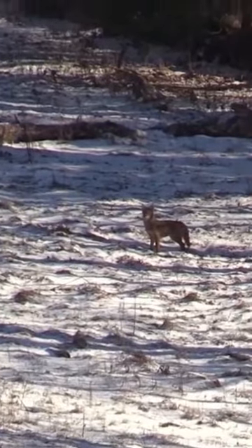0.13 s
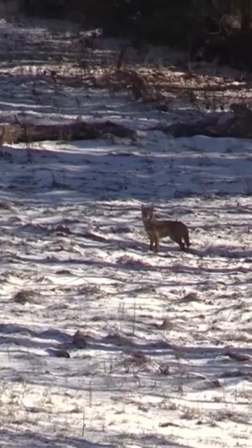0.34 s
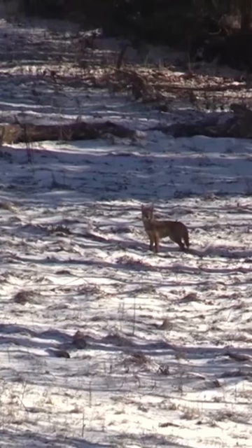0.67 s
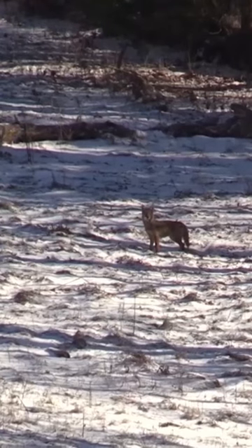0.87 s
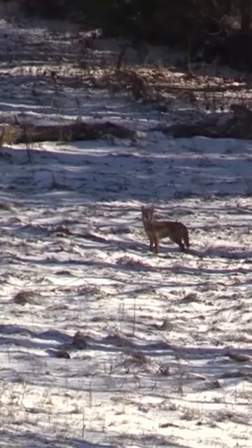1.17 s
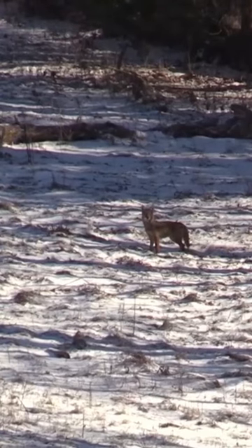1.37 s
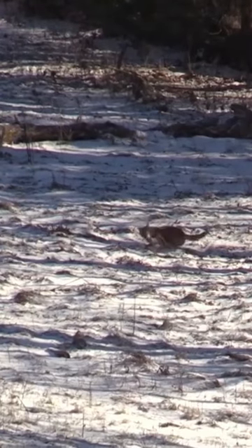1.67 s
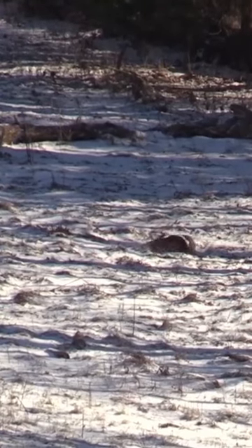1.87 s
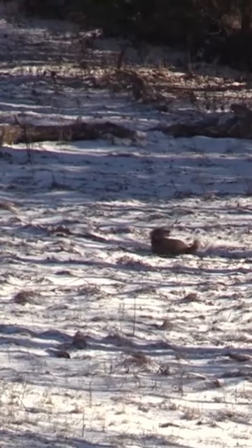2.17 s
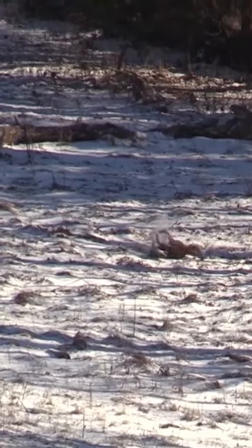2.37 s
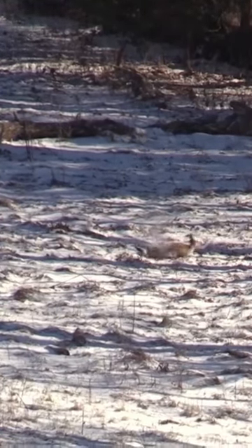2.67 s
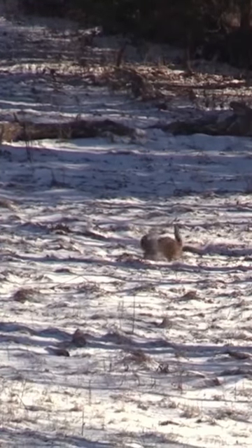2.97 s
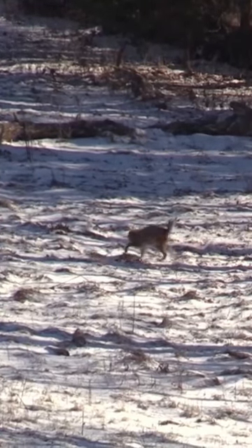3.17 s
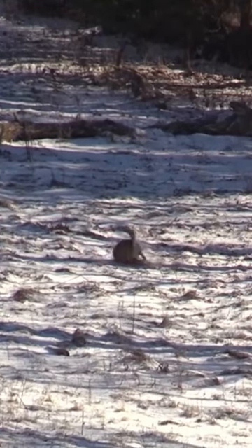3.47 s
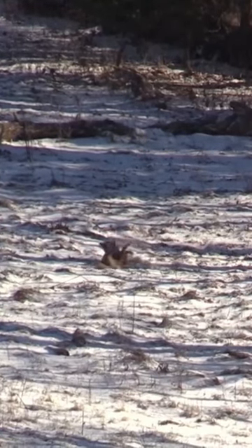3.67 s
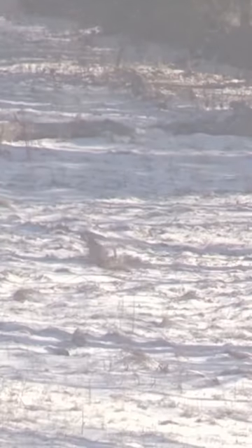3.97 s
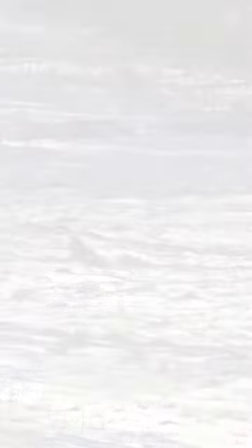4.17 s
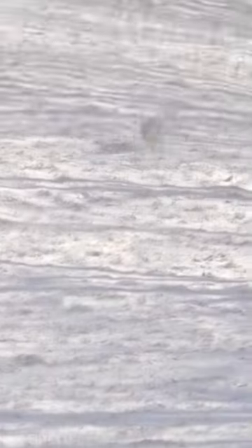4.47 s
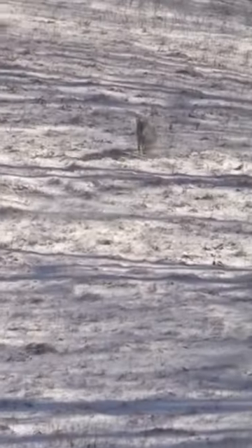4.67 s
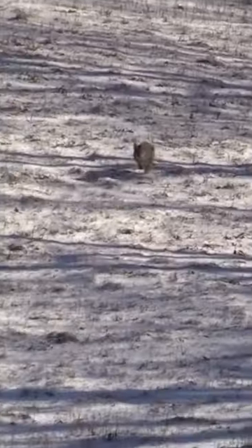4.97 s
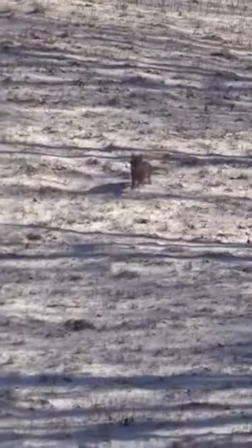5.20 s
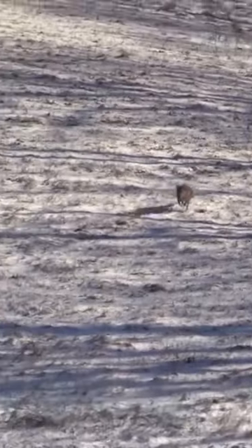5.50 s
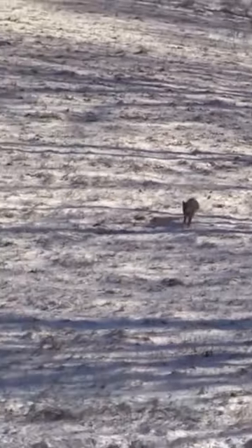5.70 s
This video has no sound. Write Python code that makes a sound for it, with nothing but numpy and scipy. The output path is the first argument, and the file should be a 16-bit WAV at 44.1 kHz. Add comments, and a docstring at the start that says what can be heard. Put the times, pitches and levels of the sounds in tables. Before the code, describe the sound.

Short high reed squeals, one loud gunshot rolling off trees and hills, a hoarse coyote and bolt clicks, then a click and gusty wind.

```python
"""A reed lure squeals in short phrases over a snowy field: partials on a gliding pitch, with a pop at some openings.
A rifle fires, a burst of coloured noise and a low push; its echo rolls back from trunks, treeline and hills.
A coyote barks and whines in partials and growls in pulsed noise; the rifle's bolt clicks as short rings.
Wind is lumpy filtered noise at the microphone, with far rustle and a faint tone behind it.
Late on, a click marks the scene changing to a windier field, where the lure is coloured differently."""
import sys
import numpy as np
from scipy import signal
from scipy.fft import rfft, irfft, next_fast_len
from scipy.io import wavfile
from scipy.ndimage import uniform_filter1d, minimum_filter1d, map_coordinates

SR = 44100
rng = np.random.default_rng(int(sys.argv[2]) if len(sys.argv) > 2 else 0)


def to_wav(s):
    """Save 16-bit WAV."""
    ch = np.atleast_2d(s).T  # columns
    pcm = np.round(np.clip(ch, -1, 1) * 32767)  # PCM
    wavfile.write(sys.argv[1], SR, pcm.astype(np.int16))


def rack_gain(trim_db):
    """Turn a fader trim in dB into the linear factor to multiply a signal by."""
    fader = np.asarray(trim_db, float)
    return 10 ** (fader / 20)


N = 257544  # samples

# click where the second field begins: t/s, level/dB
CUT = (4.262, -16)


def unit(x):
    """Scaled to rms 1."""
    return x / np.sqrt(np.mean(x ** 2) + 1e-20)


def along(points, hz):
    """(Hz, value) points read on a log frequency axis."""
    f, v = np.transpose(points)
    return np.interp(np.log(hz + 1), np.log(f + 1), v)


def curves(rows):
    """One value per sample for each column after the time."""
    s, *cols = np.transpose(rows)
    return [np.interp(np.arange(N) / SR, s, c) for c in cols]


def gate(rows, fade):
    """Open from the first row to the last, with soft edges (s)."""
    t = np.arange(N) / SR
    return np.clip(np.minimum(t - rows[0][0], rows[-1][0] - t) / fade + 0.5, 0, 1)


def wobble(rate):
    """A smooth random curve, rate knots a second."""
    knots = rng.standard_normal(int(N * rate / SR) + 4)
    return map_coordinates(knots, [np.arange(N) * rate / SR])


def filtered(x, response):
    """x times a response of frequency."""
    m = next_fast_len(len(x) + 8192)
    return irfft(rfft(x, m) * response(np.fft.rfftfreq(m, 1 / SR)), m)[:len(x)]


def rush(spectrum, patchy_db):
    """Coloured noise of rms 1 with patches of random gain in time and frequency."""
    z = signal.stft(rng.standard_normal(N), nperseg=512)[2]
    field = uniform_filter1d(uniform_filter1d(rng.standard_normal(z.shape), 8, 0), 5, 1)
    x = signal.istft(z * rack_gain(patchy_db * unit(field)), nperseg=512)[1][:N]
    return unit(filtered(x, lambda hz: rack_gain(along(spectrum, hz))))


def turns(hz, jitter):
    """Phase of an oscillator whose pitch trembles."""
    return 2 * np.pi * np.cumsum(hz * (1 + jitter * wobble(150))) / SR


def lure():
    """A blown reed pops open, then sings partials coloured by the bell; the lip moves the pitch smoothly."""
    # reed phrases, each a list of: t/s, pitch f/Hz, level/dB
    squeals = [
        [(0.0, 1102, -48.5), (0.02, 1291, -35), (0.035, 1379, -39.5), (0.05, 1434, -43.5), (0.074, 1554, -37.5),
         (0.081, 1940, -40.5), (0.088, 1967, -33.5), (0.126, 1969, -34.5), (0.152, 1686, -42.5),
         (0.175, 1715, -44.5)],
        [(0.365, 1064, -53.5), (0.389, 1321, -43.5), (0.417, 1325, -43), (0.453, 1333, -40), (0.462, 1470, -43),
         (0.468, 1599, -33.5), (0.479, 1592, -35), (0.53, 1593, -77.5)],
        [(0.652, 1806, -52), (0.668, 1569, -35), (0.69, 1714, -31.5), (0.7, 1785, -44), (0.707, 2270, -45),
         (0.716, 2690, -42), (0.74, 2758, -47.5), (0.765, 2648, -36), (0.839, 2805, -35), (0.909, 2818, -39.5),
         (0.929, 2254, -48), (0.94, 2157, -54)],
        [(1.072, 1038, -48), (1.088, 1186, -40.5), (1.118, 1438, -46.5), (1.14, 1939, -39), (1.15, 2335, -39),
         (1.182, 2459, -40), (1.21, 2400, -40), (1.224, 2442, -38), (1.285, 2569, -40), (1.31, 2464, -39.5)],
        [(1.545, 2328, -35), (1.575, 2639, -37), (1.59, 2619, -42)],
        [(1.63, 2163, -40), (1.65, 2350, -35), (1.67, 2441, -35), (1.735, 2524, -38)],
        [(1.76, 2655, -31), (1.774, 2454, -38), (1.815, 2594, -31)],
        [(2.1, 2544, -43), (2.126, 2650, -41), (2.21, 2561, -38.5)],
        [(2.385, 1744, -35.5), (2.425, 1926, -32.5), (2.469, 2167, -34.5), (2.49, 1989, -33.5),
         (2.51, 1866, -33), (2.564, 1904, -37), (2.58, 1980, -38), (2.588, 2645, -38), (2.6, 2671, -39.5),
         (2.615, 2056, -49.5)],
        [(2.712, 1282, -39.5), (2.755, 1480, -33.5), (2.775, 1507, -40.5), (2.803, 1701, -29.5),
         (2.829, 1815, -32.5), (2.858, 2665, -55), (2.868, 2208, -37), (2.878, 1933, -71.5)],
        [(2.988, 1509, -43), (3.0, 1602, -33), (3.03, 1717, -37.5), (3.04, 2508, -42.5), (3.056, 2340, -48.5),
         (3.085, 2700, -36), (3.17, 2681, -38), (3.203, 2730, -36), (3.215, 2264, -32.5), (3.225, 2018, -68)],
        [(3.352, 2001, -45), (3.366, 1589, -37), (3.388, 1826, -37), (3.4, 2233, -39.5), (3.434, 2640, -38),
         (3.445, 2669, -31.5), (3.5, 2480, -43.5), (3.53, 2475, -45), (3.57, 2520, -47), (3.586, 2562, -44.5),
         (3.6, 2947, -43), (3.625, 2040, -38.5)],
        [(3.742, 1314, -42.5), (3.774, 1582, -44), (3.79, 2148, -31.5), (3.802, 2365, -41.5),
         (3.82, 2696, -37.5), (3.838, 2590, -37), (3.88, 2412, -36), (3.9, 2560, -42.5), (3.914, 2765, -38),
         (3.932, 2895, -49.5), (3.958, 2896, -44.5), (3.98, 2114, -35.5)],
        [(4.098, 1870, -42), (4.112, 1635, -31.5), (4.136, 1820, -32.5), (4.146, 2090, -54), (4.16, 2740, -55),
         (4.205, 2670, -40), (4.228, 2790, -43), (4.26, 2790, -33.5)],
        [(4.265, 1060, -57.5), (4.311, 1144, -52), (4.365, 1300, -59.5), (4.45, 1192, -64.5),
         (4.494, 1207, -54.5), (4.546, 1320, -62), (4.594, 1225, -59), (4.636, 1299, -71.5), (4.664, 1392, -73),
         (4.7, 1340, -59), (4.76, 1410, -71.5), (4.832, 1390, -53.5), (4.87, 1312, -62.5), (4.934, 1292, -52.5),
         (5.01, 1315, -45), (5.042, 1290, -45), (5.07, 1150, -63.5)],
        [(5.305, 1101, -66.5), (5.353, 937, -49.5), (5.425, 1112, -56), (5.457, 1142, -52.5),
         (5.547, 1077, -51), (5.651, 1176, -46), (5.713, 1086, -46.5), (5.8, 1121, -51.5), (5.84, 1183, -65)],
    ]
    # how sharply the reed closes: t/s, gain of the overtones/dB
    bite = [(0.0, -5), (0.07, 2), (0.09, -10), (0.16, -19.5), (0.36, -6), (0.458, 10), (0.466, -25.5),
            (0.655, -17.5), (0.67, -13.5), (0.69, -1), (0.8, -5), (1.1, -1.5), (1.3, 3), (2.4, -13.5),
            (2.42, -10.5), (2.47, 4.5), (2.51, -7), (2.71, 0.5), (2.8, -4.5), (3.0, -14.5), (3.03, 3),
            (3.354, -8), (3.368, -1), (3.49, -5.5), (3.57, 19), (3.61, -7.5), (3.9, -0.5), (4.1, -22),
            (4.113, -2.5), (4.145, 0), (4.25, -1.5), (4.27, -1), (4.9, -3), (5.35, 11), (5.84, -4.5)]
    # the bell: f/Hz, relative gain/dB
    horn = [(1000, -4), (1350, -11), (1700, -3.5), (2100, -3.2), (2700, -3.8), (3400, -5.5), (4100, -9.5),
            (5200, -26.5), (5900, -32), (6800, -53), (9000, -89.5)]
    # colour added in the second field: f/Hz, relative gain/dB
    afar = [(1100, -19), (1350, 1.5), (2300, 6.5), (3400, 6), (3600, -5), (3900, -20), (4700, -4.5),
            (6000, -14)]
    # the reed snapping open: t/s, level/dB, f/Hz
    pops = [(0.6548, -38, 1570), (1.0765, -33, 2177), (2.7057, -32, 1654), (2.9916, -24, 1570),
            (3.3505, -20, 1964), (3.7402, -26, 1757), (4.0987, -24, 1800)]
    slope_db = -2  # each partial under the one below
    stiff_hz, stiff_db_per_khz = 1410, -11  # above this pitch the third and higher partials thin out

    hz, level_db = curves(np.concatenate(squeals))
    hz = uniform_filter1d(hz, size=150) * (1 + 0.006 * wobble(45))  # the lip quivers
    phase = turns(hz, jitter=0.0042)
    k = np.arange(5)[:, None]  # 0 is the fundamental
    partial_hz = (k + 1) * hz

    second_field = np.arange(N) >= CUT[0] * SR
    share_db = along(horn, partial_hz) + second_field * along(afar, partial_hz)
    share_db += (k > 0) * curves(bite)[0] + k * slope_db
    share_db += (k > 1) * stiff_db_per_khz * np.maximum(hz - stiff_hz, 0) / 1000
    shares = rack_gain(share_db)
    sizes = rack_gain(level_db) * shares / np.linalg.norm(shares, axis=0)
    sizes = uniform_filter1d(sizes, size=380)
    tone = np.sum(sizes * np.sin((k + 1) * phase), axis=0)

    # turbulent air roughens the partials, most where the pitch breaks
    leap = np.clip(np.abs(np.gradient(hz)) * SR / 40000, 0, 1)
    tone *= 1 + (rack_gain(-36) + 0.5 * leap) * wobble(1200)
    blown = sum(gate(rows, 0.0014) for rows in squeals)
    out = np.sqrt(2) * np.minimum(blown, 1) * tone * rack_gain(2.2 * wobble(90))

    u = np.arange(SR // 20) / SR
    for s, db, pop_hz in pops:
        pop = rack_gain(db - 60 * u / 0.03) * np.sin(2 * np.pi * pop_hz * u)
        out[round(s * SR):][:len(u)] += pop * (1 - np.exp(-u / 0.0008))
    return out


def shot():
    """The muzzle blast, then its echo: near trunks hiss, the treeline cracks, far hills boom, duller with distance."""
    # colours of blast and of the three distances: f/Hz, relative level/dB
    blast_colour = [(120, -30), (200, -0.5), (1910, -9), (2510, -8.5), (2910, -1), (3830, -8),
                    (14100, -26.5), (16000, -36.5)]
    boom_colour = [(110, -53), (180, -24), (429, -3), (544, -6), (736, -6.5), (813, -10.5), (1600, -16),
                   (2080, -31), (3520, -120)]
    crack_colour = [(290, -41.5), (500, -6.5), (629, -2.5), (1020, 2), (2690, 7.5), (3600, -0.5),
                    (6000, -21), (7800, -54), (13200, -120)]
    hiss_colour = [(900, -31), (1800, -15), (3000, 3.5), (4200, 0.5), (6300, -11.5), (8500, -8.5),
                   (10800, -19.5), (13200, -18.5), (16000, -29)]
    # echo: t/s, far hills' boom level/dB, treeline's crack level/dB, near trunks' hiss level/dB
    echo_rows = [(1.32, -63, -37, -31.5), (1.342, -56, -44, -31.5), (1.48, -64, -45.5, -36.5),
                 (1.57, -75, -41, -33.5), (1.62, -51, -31, -33), (1.66, -64, -41.5, -33.5),
                 (1.69, -42, -27, -35), (1.725, -45.5, -35, -38), (1.76, -68, -45.5, -41),
                 (1.836, -69, -41, -43.5), (1.846, -46, -27, -41.5), (1.926, -46, -22.5, -34.5),
                 (1.975, -42, -28.5, -41), (2.04, -42.5, -28.5, -40.5), (2.09, -36.5, -29.5, -37),
                 (2.098, -48, -35.5, -44.5), (2.115, -36, -30.5, -46), (2.187, -29.5, -36, -51),
                 (2.33, -37, -39.5, -57.5), (2.62, -41, -51.5, -67.5), (2.85, -47, -62, -74.5),
                 (3.05, -51, -65, -83), (3.3, -61, -56.5, -83)]
    # single reflectors: t/s, level/dB (before the cut in the loop), f/Hz
    slaps = [(1.609, -25.5, 980), (1.689, -10.5, 772), (1.709, -20.5, 842.6), (1.843, -24.5, 1270),
             (1.969, -16.5, 711), (2.0911, -8, 800), (2.188, -21, 405), (2.254, -30, 617)]

    t = np.arange(N) / SR - 1.3115  # s from the muzzle blast
    blast = rack_gain(-2 - 60 * np.abs(t) / 0.029) * np.clip(t / 0.0014, 0, 1) ** 2
    blast = blast * rush(blast_colour, patchy_db=-3.5)
    push = rack_gain(-12 - 60 * np.abs(t) / 0.033) * np.clip(t / 0.002, 0, 1)
    blast += push * np.sin(2 * np.pi * 265 * t)  # the low push

    boom_db, crack_db, hiss_db = curves(echo_rows)
    uneven = wobble(45) + 1.1 * wobble(220)  # reflectors stand at uneven distances
    echo = rack_gain(boom_db + 1.5 * uneven) * rush(boom_colour, patchy_db=1.6)
    echo += rack_gain(crack_db + 1.6 * uneven) * rush(crack_colour, patchy_db=1)
    echo += rack_gain(hiss_db + 0.7 * uneven) * rush(hiss_colour, patchy_db=0.7)
    out = blast + gate(echo_rows, 0.012) * echo

    u = np.arange(SR // 20) / SR
    for s, db, hz in slaps:
        thud = np.sin(2 * np.pi * hz * u) * rack_gain(-60 * u / 0.015)
        grit = uniform_filter1d(rng.standard_normal(len(u)), size=6)
        thud += 0.46 * rack_gain(-60 * u / 0.0046) * grit
        out[round(s * SR):][:len(u)] += rack_gain(db - 2.5) * thud * (1 - np.exp(-u / 0.00041))
    return out / (1 + np.abs(out / 0.13) ** 8) ** (1 / 8)  # the capsule overloads


def coyote():
    """A hoarse harmonic bark, thin whines, and growls of uneven slow pulses in a moving throat resonance."""
    # voiced bark: t/s, pitch f/Hz, level/dB
    bark_rows = [(3.3, 253.4, -76), (3.336, 287.6, -48), (3.398, 303, -45), (3.47, 301, -62)]
    # throat in the bark: f/Hz, gain/dB
    bark_throat = [(600, -6.5), (880, 8), (1200, -10), (1500, -7.5), (2200, -5.5), (3000, -63)]
    # whines, each a list of: t/s, pitch f/Hz, level/dB
    whines = [
        [(0.14, 985, -66), (0.264, 922, -67), (0.32, 840, -64), (0.46, 807, -65), (0.6, 778, -72),
         (0.672, 735, -63), (0.76, 690, -78.5)],
        [(2.73, 791, -54.5), (2.792, 840, -40.5), (2.81, 800, -69)],
        [(3.1, 686.5, -66), (3.192, 681, -55), (3.25, 673, -62)],
        [(3.46, 700, -60), (3.512, 819, -43), (3.542, 766, -48), (3.6, 863, -54), (3.62, 788.5, -46),
         (3.705, 749, -48.5), (3.75, 745, -51)],
        [(3.756, 1235, -51.5), (3.89, 1249, -46), (3.928, 1413, -42.5), (4.002, 1334, -47), (4.028, 1205, -52),
         (4.082, 904, -60), (4.17, 780, -59.5)],
    ]
    # growls: start t/s, end t/s, throat f/Hz at start, throat f/Hz at end, level/dB
    growls = [(0.176, 0.29, 1090, 930, -57), (0.294, 0.95, 840, 756, -70), (3.305, 3.49, 855, 800, -47.5),
              (3.484, 3.76, 883, 896, -42), (3.761, 4.09, 860, 1044, -49.5),
              (5.374, 5.658, 1054, 940, -62.5), (5.666, 5.737, 1050, 1140, -58.5),
              (5.722, 5.86, 1150, 1100, -50)]

    hz, db = curves(bark_rows)
    phase = turns(hz, jitter=0.01994)
    bark = sum(rack_gain(along(bark_throat, k * hz) + 1.3 * wobble(50)) * np.sin(k * phase) for k in range(2, 10))
    out = np.sqrt(2) * rack_gain(db) * gate(bark_rows, 0.03) * bark

    for rows in whines:
        hz, db = curves(rows)
        phase = turns(hz, jitter=0.01)
        # lower partials of a slower fold rhythm, stronger in loud cries
        under = np.sin(phase * 5 / 6) + np.sin(phase * 4 / 6)
        size = np.sqrt(2) * rack_gain(db + 2.6 * wobble(40)) * gate(rows, 0.015)
        under_size = rack_gain(np.minimum(db + 36, -11) + 2.5 * wobble(30))
        out += size * (np.sin(phase) + under_size * under)

    flap_hz = 48 * rack_gain(2.5 * wobble(25))
    flaps = (1 + np.cos(2 * np.pi * np.cumsum(flap_hz) / SR)) ** 1.1  # vocal folds slap shut
    f, t, z = signal.stft((flaps + 3.2) * rng.standard_normal(N), SR, nperseg=256)
    f = f[:, None]
    for start, end, from_hz, to_hz, db in growls:
        centre = np.interp(t, [start, end], [from_hz, to_hz])
        throat = 1 / (1 + ((f - centre) / 90) ** 2)
        throat += 0.2 / (1 + ((f - 1.96 * centre) / 400) ** 2)
        growl = unit(signal.istft(z * throat, nperseg=256)[1][:N])
        out += rack_gain(db) * gate([[start], [end]], 0.045) * growl
    return out


def bolt():
    """Each contact rings the steel briefly, knocks the stock and leaves a bright tail among the trunks."""
    # metal contacts: t/s, level/dB, ring f/Hz, stock knock level/dB over the contact, tail t60/s
    contacts = [(3.2593, -31, 1220, -52, 0.03), (3.495, -30.5, 2560, -7.5, 0.1),
                (3.4997, -29, 4130, -19, 0.3), (3.548, -44.5, 2600, 5, 0.13), (3.6814, -9, 3230, -36, 0.1)]
    # colour of the clatter: f/Hz, relative level/dB
    steel = [(1500, -20.5), (3000, 6.5), (5500, -9), (8000, -7.5), (10000, -20), (15000, -24.5)]

    out, t = np.zeros(N), np.arange(SR // 4) / SR
    clatter = rush(steel, patchy_db=1.5)
    for s, db, hz, knock_db, t60 in contacts:
        at = round(s * SR)
        ring = rack_gain(-60 * t / 0.02) * np.sin(2 * np.pi * hz * t)
        ring += 0.12 * rack_gain(-60 * t / 0.03) * np.sin(2 * np.pi * 7100 * t)
        knock = rack_gain(knock_db - 60 * t / 0.1) * np.sin(2 * np.pi * 305 * t)
        crack = (0.32 * rack_gain(-60 * t / 0.014) + 0.072 * rack_gain(-60 * t / t60)) * clatter[at:at + len(t)]
        out[at:at + len(t)] += rack_gain(db) * (ring + knock + crack) * (1 - np.exp(-t / 0.00019))
    return out


def woods(x, hills_db):
    """Near trees answer at once, each frequency dying at its own speed; the hills answer late and dull."""
    # near trees: f/Hz, t60/s
    trees = [(500, 0.28), (2000, 0.22), (3000, 0.29), (6000, 0.31)]
    # the hills' late answer: delay t/s, level/dB before hills_db is added
    hills = [(.1, -29), (.25, -18.5), (.5, -20), (.6, -20), (.9, -16.5), (1.3, -57.5)]

    hz, t, z = signal.stft(rng.standard_normal(3 * SR // 2), SR, nperseg=256)
    hz = hz[:, None]
    near = rack_gain(-60 * t / along(trees, hz))
    late = rack_gain(np.interp(t, *np.transpose(hills), right=-90) + hills_db - 2.5 * hz / 1000)
    tail = signal.istft(z * (near + late), SR, nperseg=256)[1]
    wet = signal.fftconvolve(np.pad(x, (600, 0)), tail / np.linalg.norm(tail))[:N]
    return wet * rack_gain(1.2 * wobble(40))  # moving air smears the answer


def wind():
    """Lumpy buffeting on the microphone, its roar, and far rustle that flickers with the roar."""
    # wind at the microphone: t/s, buffet level/dB, roar level/dB
    gusts = [(0.0, -37.5, -54), (0.2, -37, -60), (0.32, -34.5, -63), (0.45, -41.5, -56), (0.62, -33, -55.5),
             (0.88, -32.5, -56.5), (1.2, -37.5, -65), (1.4, -47.5, -54.5), (1.52, -35.5, -41),
             (1.64, -41, -58), (1.78, -27, -49.5), (1.9, -24.5, -54), (2.07, -43.5, -71),
             (2.22, -41.5, -42), (2.45, -37.5, -72), (3.02, -57.5, -69), (3.28, -27.5, -51.5),
             (3.5, -39, -61), (3.8, -28.5, -57.5), (4.2, -28, -52), (4.28, -18, -34.5), (4.9, -22, -33.5),
             (5.3, -24.5, -37), (5.55, -24.5, -39.5), (5.84, -26, -41)]
    # distant rustle: t/s, level/dB
    air = [(0, -66), (1.3, -70.5), (3.3, -68.5), (3.5, -64), (4.2, -66.5), (4.7, -70.5), (5.3, -67.5),
           (5.84, -62)]
    # colours of the three: f/Hz, relative level/dB
    buffet_colour = [(8.8, -35), (15, 10), (36, 1.5), (130, -22), (170, -49), (290, -120)]
    roar_colour = [(41, -40.5), (70, -9.5), (122, -13), (387, -38), (639, -50.5), (792, -55.5), (900, -51),
                   (1170, -72.5), (1980, -120)]
    rustle_colour = [(240, -16), (400, -7.5), (545, -19.5), (753, -10), (1420, -25), (1530, -17.5),
                     (1710, -22), (2020, -16), (2290, -13.5), (7990, -31), (16000, -45.5)]

    buffet_db, roar_db = curves(gusts)
    lumps, flicker = wobble(9.8), wobble(30)
    buffet = rack_gain(buffet_db) * unit(rack_gain(1.6 * lumps) * rush(buffet_colour, patchy_db=0.6))
    roar = rack_gain(roar_db) * unit(rack_gain(1.3 * lumps + 2.2 * flicker) * rush(roar_colour, patchy_db=1.5))
    rustle = rack_gain(curves(air)[0] + 2.1 * flicker) * rush(rustle_colour, patchy_db=0.8)
    return buffet + roar + rustle


def linger():
    """A faint tone over the far field, its pitch and level blurred by the air it crosses."""
    # t/s, f/Hz, level/dB
    far_tone = [(5.3, 2630, -74), (5.5, 2630, -67), (5.84, 2630, -65)]
    hz, db = curves(far_tone)
    size = np.sqrt(2) * rack_gain(db + 4.2 * wobble(45)) * gate(far_tone, 0.03)
    return size * np.sin(turns(hz, jitter=0.006))


def scene():
    """Voices with their answer from the woods, cut off where the field changes; shot, bolt, wind and far tone."""
    voices, cut = lure() + coyote(), round(CUT[0] * SR)
    before = np.arange(N) < cut
    wet = before * woods(before * voices, hills_db=7.5)
    wet = wet + woods(~before * voices, hills_db=5.5)
    click, u = np.zeros(N), np.arange(400)
    click[cut:cut + 400] = rack_gain(CUT[1]) * np.exp(-u / 30) * (1 - np.exp(-u / 3))
    return (voices + rack_gain(-19.5) * wet + shot() + linger() + bolt() + wind() + click)[None]


def top_cut(x):
    """Nothing passes above the cut-off."""
    return signal.sosfilt(signal.butter(12, 16470, fs=SR, output="sos"), x)


def record(dry):
    """A limiter ducks the whole mix around every peak above 0.13, such as the strongest wind lumps."""
    needed = np.minimum(1, 0.13 / (np.abs(dry) + 1e-9))
    gain = uniform_filter1d(minimum_filter1d(needed, size=700), size=700)
    return top_cut(dry * gain)


dry = scene()
out = record(dry)
to_wav(out)
```